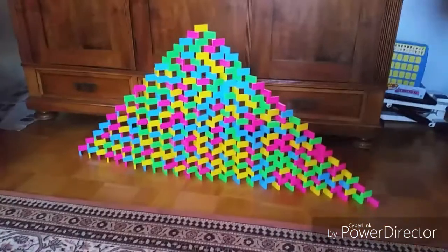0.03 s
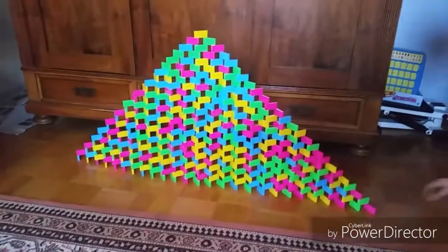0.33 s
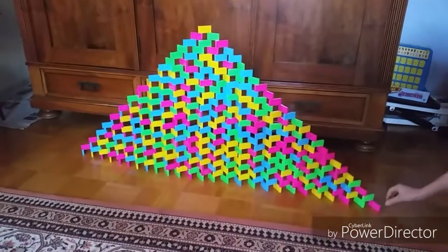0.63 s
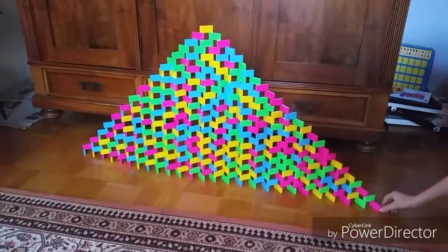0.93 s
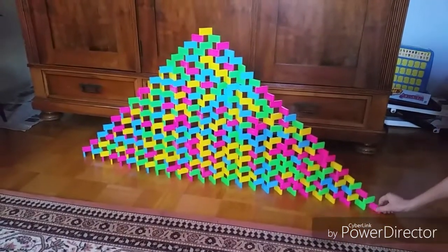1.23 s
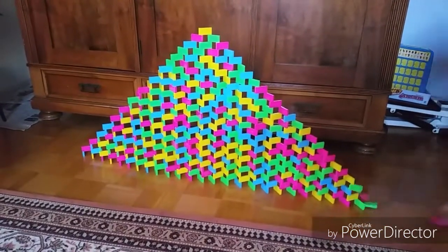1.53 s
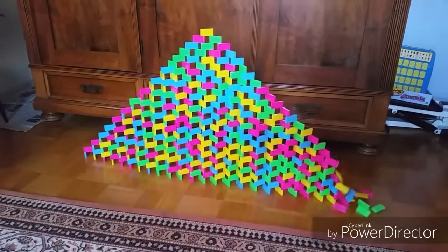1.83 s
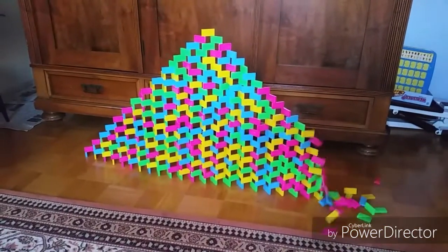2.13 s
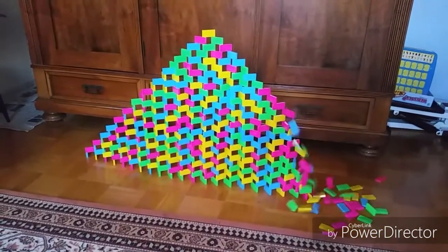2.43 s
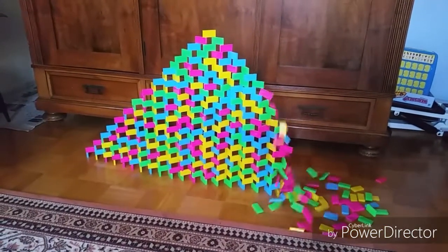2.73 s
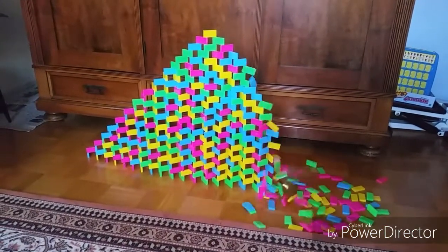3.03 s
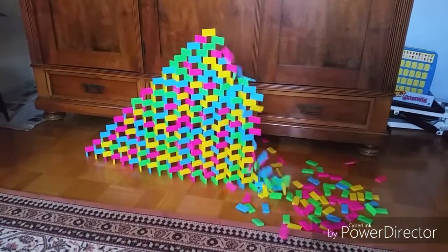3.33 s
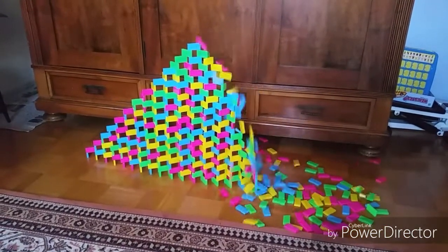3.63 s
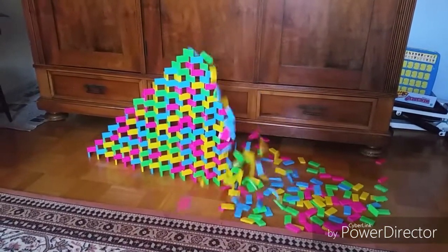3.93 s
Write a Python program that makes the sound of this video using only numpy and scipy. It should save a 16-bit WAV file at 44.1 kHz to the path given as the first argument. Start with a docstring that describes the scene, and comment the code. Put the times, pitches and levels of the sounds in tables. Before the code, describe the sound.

A stack of plastic dominoes collapses in a quiet room. After faint rustles and a brief dull slide, the tiles keep tumbling, clacking brightly against each other and knocking on the wooden floor with a short room echo.

```python
"""Faint rustling and a few soft bumps are heard first, in a quiet room. Then a pyramid of plastic
dominoes gives way with a dull slide and collapses, slice by slice, onto a wooden floor.
Each impact of tile on tile excites a brief edge crack and free vibration in four shared modes.
Tiles that land drive the resonances of the boards, flat hits snap, and the room adds a short decay."""
import sys
import numpy as np
from scipy import signal
from scipy.fft import rfft, irfft
from scipy.io import wavfile
from scipy.ndimage import uniform_filter1d

SR = 44100
rng = np.random.default_rng(int(sys.argv[2]) if len(sys.argv) > 2 else 0)


def inscribe(sig):
    """Save sig as 16-bit PCM at rate SR to the path in sys.argv[1].

    A 1-D sig is mono; a 2-D sig holds one channel per row.
    Samples are clipped to [-1, 1] before scaling.
    """
    pcm = np.round(np.clip(np.atleast_2d(sig).T, -1, 1) * 32767)
    wavfile.write(sys.argv[1], SR, pcm.astype(np.int16))


N = 176400

# Spectra of the sources. Each row: frequency in Hz, relative spectral density in dB.
AIR_SPECTRUM = [(25, 0.5), (49, -4.5), (415, -19), (1670, -55), (3930, -26.5), (5500, -54), (15000, -34)]
LOW_RUSTLE_SPECTRUM = [(40, 0), (130, 0), (300, -2), (600, -5.5), (1200, -24.5), (4000, -54)]
HIGH_RUSTLE_SPECTRUM = [(200, -19), (750, 4), (1400, 2.5), (2800, 0), (4200, -7.5), (6000, -17.5),
                        (15000, -34)]
SLIDE_SPECTRUM = [(40, -15), (130, -3), (300, 0.5), (450, -6.5), (750, 1.5), (1300, -2), (2900, -12.5),
                  (4000, -27.5), (8000, -49)]
BOARD_SPECTRUM = [(25, -29), (45, -22), (70, -19), (130, -4.5), (190, -7), (300, -5.5), (450, -5.5),
                  (750, 0.5), (1200, -0.5), (1900, 2), (2700, 5.5), (3600, -2.5), (5000, -2), (7000, -24.5),
                  (15000, -42)]
EDGE_SPECTRUM = [(300, -10.5), (2000, -3), (4000, 6.5), (6300, 8), (8500, 1.5), (10500, 3), (12500, 6.5),
                 (14300, 4), (16000, -5.5)]
# Stereo balance. Each row: frequency in Hz, left minus right in dB.
BOARD_PAN = [(700, 0), (1250, 5), (2400, 2), (6000, -0.5)]
EDGE_PAN = [(1000, -8), (4500, 3), (8000, -1), (13000, -9.5)]
# Rustle before the fall. Each row: time in seconds, relative levels of the low and high bands in dB.
RUSTLE_LEVELS = [(0.01, -51, -60), (0.246, -67.5, -65), (0.304, -57, -62), (0.57, -63.5, -65),
                 (0.656, -56.5, -61), (0.976, -74.5, -78), (1.05, -63, -69), (1.224, -89, -78),
                 (1.334, -79, -111)]
# Soft bumps and scuffs. Each row: start in seconds, centre in Hz, half width in natural-log frequency,
# level in dB, rise in seconds, 60 dB decay time in seconds.
BUMPS = [(.078, 242, 0.27, -41.5, 0.0049, 0.077), (.13, 2970, 0.39, -59.5, 0.093, 0.33),
         (.28, 70, 0.41, -51, 0.012, 0.27), (.33, 95, 0.13, -47, 0.048, .3),
         (0.375, 1500, 0.43, -56, .001, .015), (.606, 735, 0.11, -58.5, 0.042, 0.5),
         (.72, 1272, 0.04, -59, 0.05, 0.38), (1.319, 314, 0.18, -55.5, 0.0053, 0.04)]
# The first tiles lean and slide. Each row: time in seconds, relative level in dB.
SLIDE_LEVELS = [(1.41, -82), (1.48, -62), (1.52, -54), (1.61, -41.5), (1.68, -53), (1.74, -100)]
# Resonances of the boards. Each row: frequency in Hz, bandwidth in Hz, gain in dB.
BOARD_MODES = [(134.6, 21, -3.5), (186, 12.3, 6), (250, 36, -5.5), (646, 34, -12), (824, 25, -22),
               (1050, 23, -0.5), (1327, 32, -11)]
# Tiles raining on the boards. Each row: time in seconds, relative level in dB.
LANDING_LEVELS = [(1.68, -41), (1.79, -31), (2.02, -29), (2.04, -43), (2.08, -30), (2.27, -38),
                  (2.35, -28.5), (2.39, -35.5), (2.5, -31.5), (2.52, -33), (3.7, -36), (3.72, -32),
                  (3.74, -33.5), (3.83, -31), (3.87, -33), (3.98, -34)]
# Single heavy landings. Each row: start in seconds, relative level in dB.
HEAVY_LANDINGS = [(1.677, -24), (1.779, -11.5), (1.878, -10), (2.314, -16), (2.479, -12), (3.245, -14.5),
                  (3.708, -11), (3.978, -19.5)]
# Flat hits. Each row: start in seconds, frequency in Hz, level in dB, 60 dB decay time in seconds.
SNAPS = [(1.861, 3150, -11, 0.0073), (2.219, 5700, -5, 0.0051), (3.3685, 6140, -1.5, 0.0033),
         (3.709, 2640, -9, 0.0043), (3.7575, 2670, -7.5, 0.013)]
# Modes of a tile. Each row: frequency in Hz, gain in dB, 60 dB decay time in seconds,
# left minus right in dB.
TILE_MODES = [(5235, -1, 0.055, 0.5), (5734, -12, 0.083, -3.5), (12007, -4.5, 0.037, -11),
              (13020, -6.5, 0.035, -6)]
# The collapse. Each row: time in seconds, relative levels of ringing and of hard edge contacts in dB.
COLLAPSE_LEVELS = [(1.68, -38, -37), (1.69, -20, -46), (1.72, -23, -38), (1.75, -57, -33), (1.76, -26, -33),
                   (1.79, -32, -61), (1.82, -43, -54), (1.85, -18, -29.5), (1.99, -19, -29),
                   (2.03, -28, -31), (2.05, -14.5, -27), (2.07, -19.5, -28.5), (2.17, -18.5, -28.5),
                   (2.18, -31, -36), (2.19, -19.5, -24.5), (2.28, -20.5, -22), (2.4, -21.5, -28),
                   (2.52, -19, -26), (2.95, -15.5, -21.5), (2.98, -24.5, -31.5), (3.03, -12.5, -23),
                   (3.08, -21, -19.5), (3.09, -6.5, -30), (3.11, -25.5, -23), (3.16, -16.5, -21),
                   (3.23, -28.5, -33), (3.27, -16.5, -21.5), (3.36, -31.5, -32), (3.42, -15.5, -20.5),
                   (3.445, -27, -39), (3.465, -20, -23), (3.48, -19.5, -22), (3.56, -19.5, -25.5),
                   (3.78, -20.5, -27), (3.79, -18.5, -25.5), (3.83, -23, -25), (3.85, -15, -18),
                   (3.91, -20.5, -19), (3.94, -14, -25), (3.98, -33, -21.5)]
# The loudest clacks. Each row: start in seconds, relative level in dB, treble offset in dB.
LOUD_CLACKS = [(1.6928, -5, -22), (1.707, -4, -31), (1.716, 0.5, -33), (1.759, -3, -28), (1.7803, 0, -22.5),
               (1.8378, -4, -18), (2.0384, -7.5, -8), (2.0496, -7.5, -9), (2.1495, -5.5, -17),
               (2.192, -9.5, -5.5), (2.2745, -16, -14), (2.3814, -0.5, -29), (2.494, -3, -36),
               (2.5224, -24, 0), (2.5838, -14.5, -7), (2.6708, 1.5, -36), (2.8255, -2, -13),
               (2.8636, -6, -14.5), (2.8998, -6, -38), (2.9205, -8, -9.5), (3.0058, -9, -11),
               (3.028, -9.5, -7), (3.0579, -11, -11), (3.0879, -3, -18), (3.408, -5, -18), (3.4515, 2, -28),
               (3.4712, -10.5, -4), (3.4962, -9.5, -3), (3.7858, -3, -10), (3.8488, -11.5, -9.5)]

CLACKS_PER_S, TICKS_PER_S, KNOCKS_PER_S = 330, 210, 420
SHOWER_DETUNE, SINGLE_DETUNE = 0.0075, 0.0025  # fractional scatter of the mode frequencies
PAN_SCATTER_DB = 2


def undb(db):
    return 10 ** (np.asarray(db) / 20)


def unit_rms(x):
    return x / np.sqrt(np.mean(x ** 2))


def decay(t, t60):
    return np.exp(-np.log(1000) * t / t60)


def envelope(table, t, column=1):
    """Amplitude at times t, interpolated in dB; silent before the first row."""
    rows = np.array(table)
    return undb(np.interp(t, rows[:, 0], rows[:, column], left=-140))


def pan_gains(db):
    """Constant-power left and right gains for a level difference."""
    pair = undb(np.array([db, -np.asarray(db)]) / 2)
    return pair / np.sqrt(np.mean(pair ** 2, axis=0))


def spectrum(points):
    """Decibel values interpolated on a log-frequency axis."""
    hz, db = np.array(points).T
    return np.interp(np.log(np.fft.rfftfreq(N, 1 / SR) + 1), np.log(hz), db)


def butterworth(x, order, hz, kind):
    return signal.sosfilt(signal.butter(order, hz, kind, fs=SR, output="sos"), x)


def colour(x, points):
    """Minimum-phase filtering at unit power gain, by folding the cepstrum onto positive time."""
    gain = unit_rms(undb(spectrum(points)))
    cepstrum = irfft(np.log(gain))
    cepstrum[1:N // 2] *= 2
    cepstrum[N // 2:] = 0
    response = irfft(np.exp(rfft(cepstrum)))[:2048]
    return signal.fftconvolve(x, response[None], axes=1)[:, :N]


def place(x, points):
    """Interaural level difference as a function of frequency."""
    response = np.roll(irfft(pan_gains(spectrum(points))), 64, axis=1)[:, :129]
    return signal.fftconvolve(x, response * np.hanning(129), mode="same", axes=1)


def add(out, start, sound):
    """Superposition of a short sound at a start time in seconds."""
    i = min(max(int(start * SR), 0), N)
    out[:, i:i + sound.shape[1]] += sound[:, :N - i]


def diffuse_noise(length, coherent_below_hz=1060):
    """A diffuse field is coherent at the two ears in the bass and uncorrelated above."""
    mid, side = rng.standard_normal((2, length))
    side = butterworth(side, 1, coherent_below_hz, "high")
    return np.array([mid + side, mid - side]) / np.sqrt(2)


def reverberation(x, t60=0.24, gap_s=0.0026, spots=16):
    """Reflections decay exponentially; each spot where tiles land has its own impulse response."""
    t = np.arange(int(t60 * SR)) / SR
    responses = [diffuse_noise(SR)[:, :len(t)] * decay(t, t60) * (t >= gap_s) for _ in range(spots)]
    hop = 1024
    window = np.sin(np.pi * np.arange(2 * hop) / (2 * hop))
    out, padded = np.zeros((2, N)), np.pad(x, ((0, 0), (0, 2 * hop)))
    for k, i in enumerate(range(0, N, hop)):
        piece = padded[:, i:i + 2 * hop] * window
        if np.abs(piece).max() > 1e-6:
            response = responses[k % spots]
            response = response / np.sqrt(np.sum(response ** 2) / 2)
            add(out, i / SR, signal.fftconvolve(piece, response, axes=1))
    return out


def shower(start, per_s, scatter_db, share_s=0.037, clump_s=0.014, clump_db=2.5):
    """Times and sizes of random impacts: neighbours share the energy of the fall and come in clumps."""
    count = int((N / SR - start) * per_s)
    jitter, quantile = rng.random((4000, 2))[:count].T
    times = start + (np.arange(count) + 2 * jitter) / per_s
    sizes = undb(-scatter_db * np.log(1 - quantile))
    local_power = uniform_filter1d(sizes ** 2, max(int(share_s * per_s), 2)) * per_s / SR
    clumps = rng.standard_normal(2000)[(times / clump_s).astype(int)]
    return times, sizes / np.sqrt(local_power) * unit_rms(undb(clump_db * np.tanh(clumps)))


def contacts(times, sizes, t60, lag_s=0.00011):
    """A brief contact is a broadband burst, located by interaural time and level differences."""
    out, t = np.zeros((2, N)), np.arange(1280) / SR
    for start, size, draws in zip(times, sizes, rng.standard_normal((2400, 1282))):
        lag, pan = draws[:2]
        crack = draws[2:] * decay(t, t60)
        crack *= size / np.sqrt(np.sum(crack ** 2))
        pair = np.array([np.interp(t - lag_s * max(ear * lag, 0), t, crack, left=0) for ear in (1, -1)])
        add(out, start, pair * pan_gains(PAN_SCATTER_DB * pan)[:, None])
    side = butterworth((out[0] - out[1]) / 2, 1, 300, "high")  # the bass stays central
    return out.mean(axis=0) + np.array([side, -side])


def tile_ringing(times, soft, hard, detune, swell_s=0.0022, scatter_db=2.5, phase_scatter_rad=1.48):
    """Free vibration is a sum of damped modes; only a hard contact excites the upper pair."""
    out, t = np.zeros((2, N)), np.arange(2400, dtype=np.float32) / SR
    draws = rng.standard_normal((4000, 4, 4))
    drives = (soft, np.sqrt(soft) * np.sqrt(hard), hard, hard)
    for k, (hz, db, t60, pan_db) in enumerate(TILE_MODES):
        rise = swell_s if k < 2 else swell_s / 4  # the contact chatters, so the lower modes build up
        shape = np.minimum(t / rise, 1) * decay(np.maximum(t - rise, 0), t60)
        for start, size, (pitch, phase, level, pan) in zip(times, drives[k], draws[:, k]):
            tile_hz = hz * (1 + detune * np.sinh(np.clip(pitch, -2, 2)))
            ear_phases = np.array([[0], [phase_scatter_rad * phase]])
            wave = np.sin(2 * np.pi * tile_hz * t + ear_phases) * shape
            gain = size * undb(db + scatter_db * np.tanh(level))
            add(out, start, gain * wave * pan_gains(pan_db + PAN_SCATTER_DB * pan)[:, None])
    return out


def quiet_room():
    """Still air, rustling, bumps and scuffs are filtered noise, each with its own envelope."""
    t = np.arange(N) / SR
    out = unit_rms(colour(diffuse_noise(N), AIR_SPECTRUM)) * undb(-65.5)
    rustle_t = np.maximum(t, RUSTLE_LEVELS[0][0])
    for band, column, db in ((LOW_RUSTLE_SPECTRUM, 1, 3.5), (HIGH_RUSTLE_SPECTRUM, 2, -1)):
        out += colour(diffuse_noise(N), band) * envelope(RUSTLE_LEVELS, rustle_t, column) * undb(db)
    for start, hz, width, db, rise, t60 in BUMPS:
        bump = unit_rms(butterworth(diffuse_noise(N), 3, hz * np.exp([-width, width]), "band"))
        shape = np.clip((t - start) / rise, 0, 1) * decay(np.maximum(t - start - rise, 0), t60)
        out += undb(db) * bump * shape
    return out


def first_topple(knock_s=1.592):
    """Sliding friction swells as the corner gives way; one soft knock weakly excites the lowest mode."""
    slide = diffuse_noise(N) * envelope(SLIDE_LEVELS, np.arange(N) / SR)
    knock = contacts([knock_s], [undb(-2.5)], t60=0.05)
    out = colour(slide + knock, SLIDE_SPECTRUM)
    out += tile_ringing([knock_s], soft=[undb(-45.5)], hard=[0], detune=SINGLE_DETUNE)
    return out + undb(0.5) * reverberation(out)


def floor_knocks(contact_t60=0.021):
    """Landing tiles excite the boards, which respond as a bank of damped resonators."""
    times, sizes = shower(LANDING_LEVELS[0][0], KNOCKS_PER_S, scatter_db=2)
    hits = contacts(times, sizes * envelope(LANDING_LEVELS, times) * undb(4), contact_t60)
    times, heavy_db = np.array(HEAVY_LANDINGS).T
    hits += contacts(times, undb(heavy_db + 15), contact_t60)
    resonance = sum(undb(db) * signal.lfilter(*signal.iirpeak(hz, hz / width, fs=SR), hits)
                    for hz, width, db in BOARD_MODES)
    out = colour(hits + resonance, BOARD_SPECTRUM)
    return place(out + undb(1) * reverberation(out), BOARD_PAN)


def flat_snaps():
    """A tile hitting flat gives a heavily damped oscillation at one frequency."""
    out, t = np.zeros((2, N)), np.arange(1024) / SR
    for start, hz, db, t60 in SNAPS:
        snap = undb(db) * np.sin(2 * np.pi * hz * t) * decay(t, t60)
        add(out, start, np.tile(snap, (2, 1)))
    return out + undb(-9.5) * reverberation(out)


def tile_clatter():
    """Collisions of tile on tile superpose: modal ringing and broadband edge ticks form a clatter."""
    times, sizes = shower(COLLAPSE_LEVELS[0][0], CLACKS_PER_S, scatter_db=4)
    mode_energy = TILE_MODES[0][2] * SR / (4 * np.log(1000))  # of a damped sine of unit amplitude
    sizes /= np.sqrt(mode_energy)
    soft = sizes * envelope(COLLAPSE_LEVELS, times) * undb(-3)
    hard = sizes * envelope(COLLAPSE_LEVELS, times, column=2) * undb(0.5)
    out = tile_ringing(times, soft, hard, SHOWER_DETUNE)
    times, sizes = shower(COLLAPSE_LEVELS[0][0], TICKS_PER_S, scatter_db=2)
    edges = contacts(times, sizes * envelope(COLLAPSE_LEVELS, times, column=2) * undb(-0.5), t60=0.027)
    times, db, treble_db = np.array(LOUD_CLACKS).T
    soft, hard = undb(db - 9), undb(db + treble_db + 8.5)
    out += tile_ringing(times, soft, hard, SINGLE_DETUNE)
    edges += contacts(times, hard * undb(10.5), t60=0.073)
    out += place(colour(edges, EDGE_SPECTRUM), EDGE_PAN)
    return out + undb(-3) * reverberation(out)


def scene():
    """Sound pressures from the separate sources add linearly."""
    return quiet_room() + first_topple() + tile_clatter() + floor_knocks() + flat_snaps()


def record(dry, low_cut_hz=54, ceiling=0.99, top_hz=15300):
    """Band limiting removes the rumble and the highest treble; clipping flattens the loudest peaks."""
    clipped = np.clip(butterworth(dry, 2, low_cut_hz, "high"), -ceiling, ceiling)
    return signal.sosfilt(signal.ellip(10, .2, 80, top_hz, fs=SR, output="sos"), clipped)


dry = scene()
out = record(dry)
inscribe(out)
```